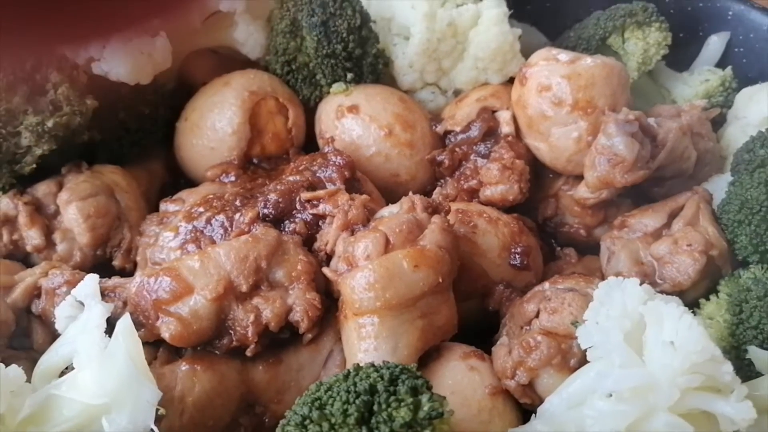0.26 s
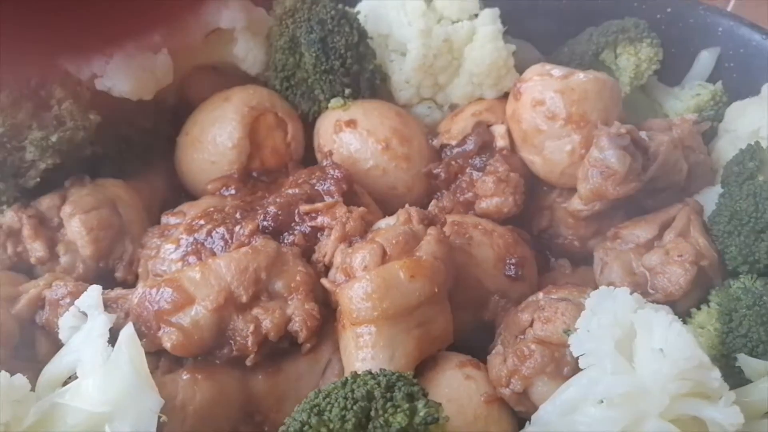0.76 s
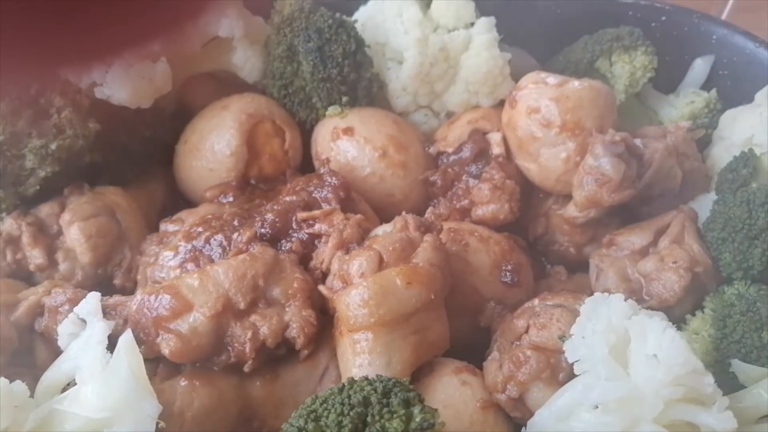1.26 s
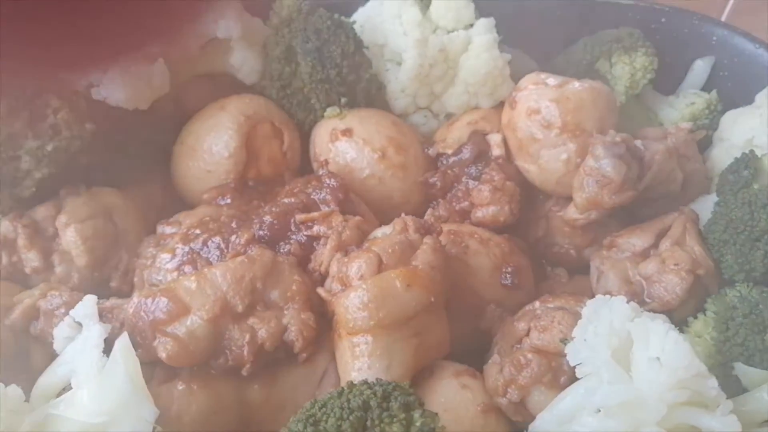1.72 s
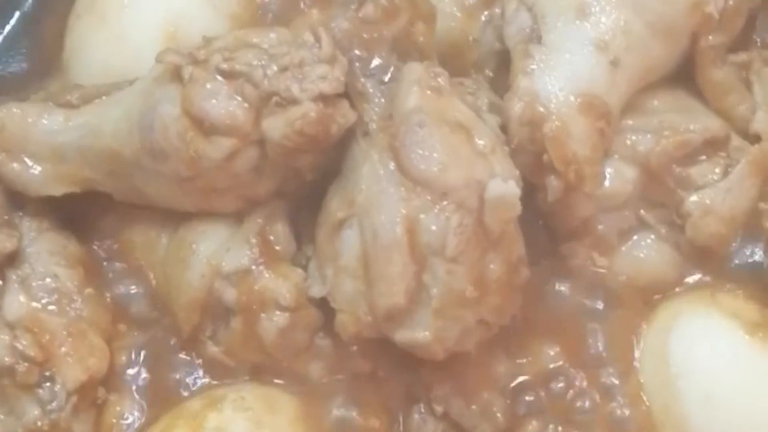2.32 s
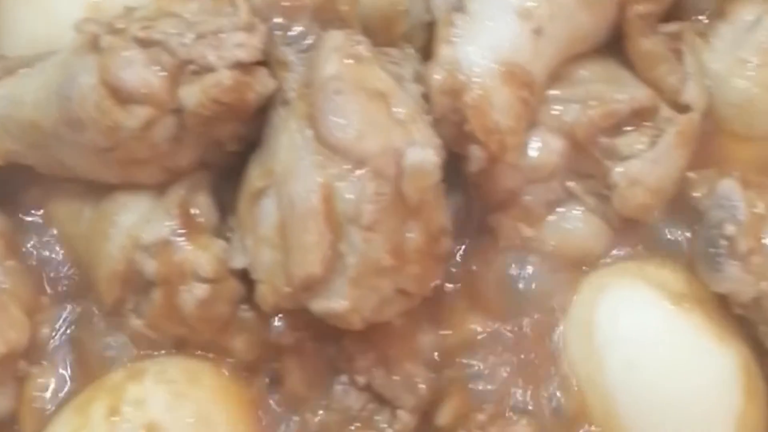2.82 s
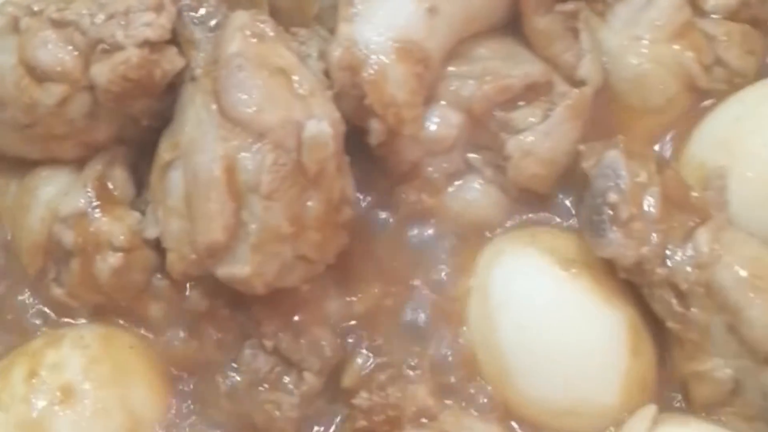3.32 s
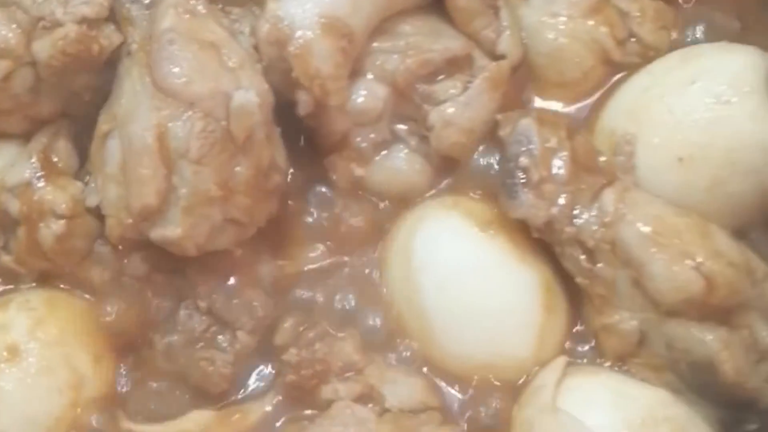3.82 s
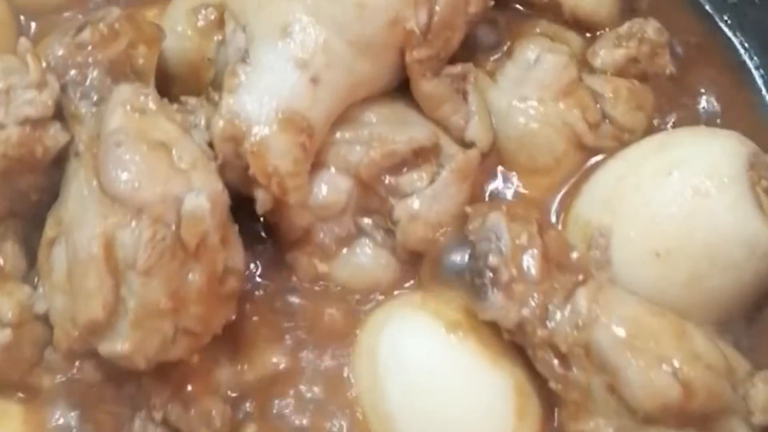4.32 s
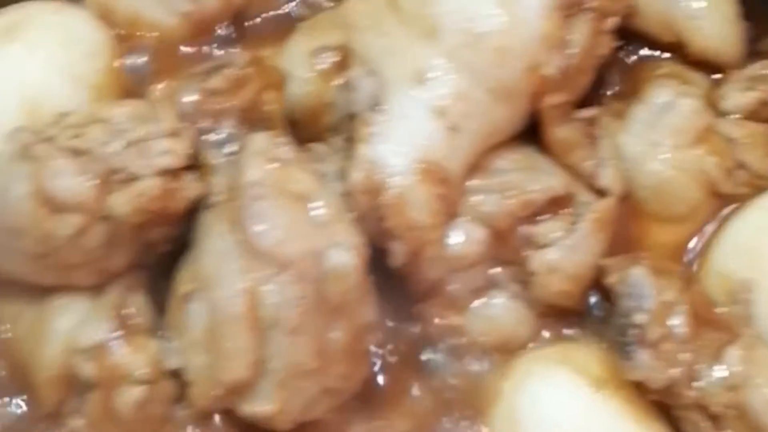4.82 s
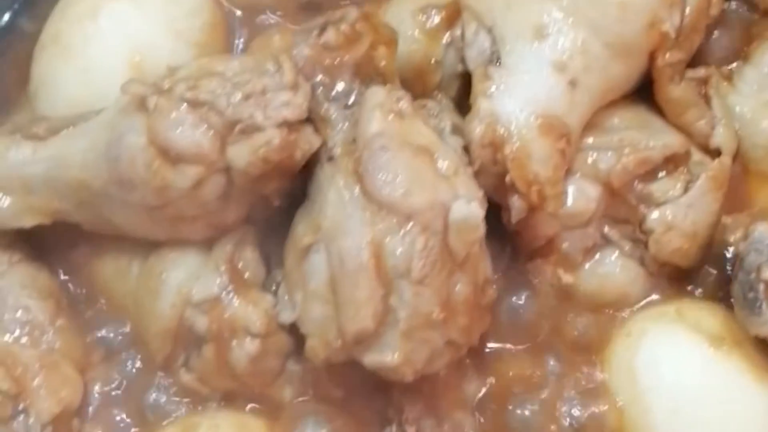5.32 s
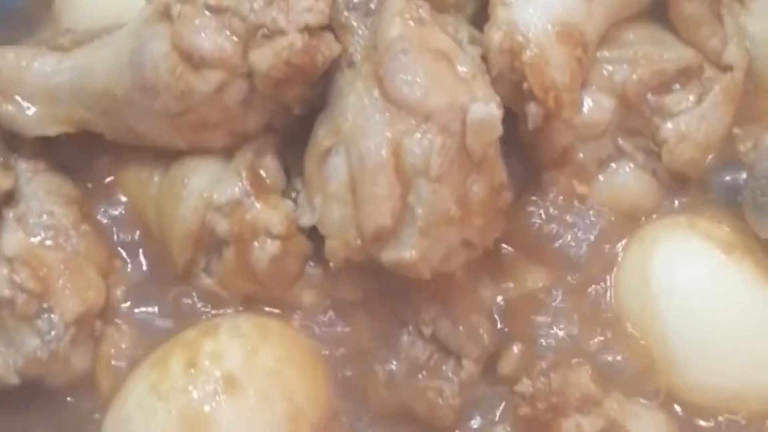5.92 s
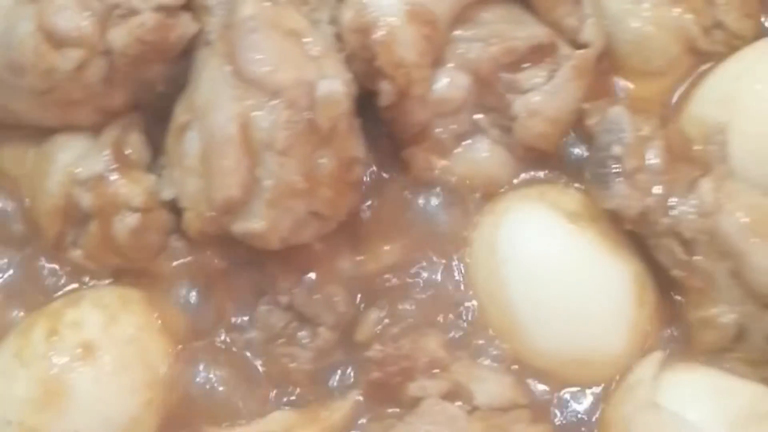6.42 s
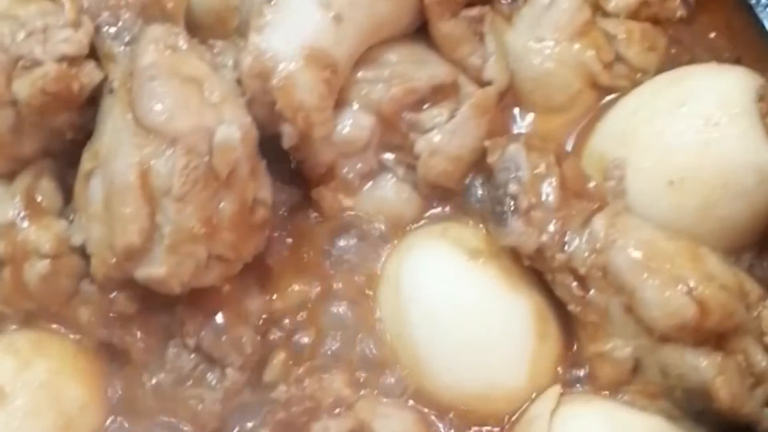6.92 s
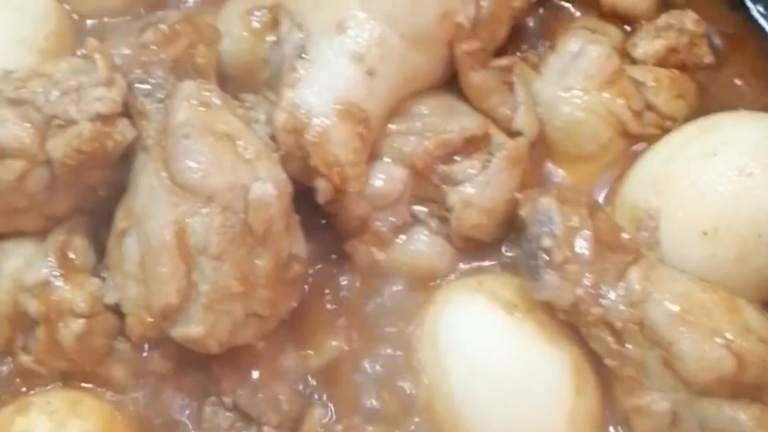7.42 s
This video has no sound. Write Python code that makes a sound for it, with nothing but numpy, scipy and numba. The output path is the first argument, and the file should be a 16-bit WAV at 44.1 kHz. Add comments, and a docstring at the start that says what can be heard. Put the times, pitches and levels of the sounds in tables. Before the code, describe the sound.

Handling wobble and ringing utensils on a worktop, a moment of dead silence, then a close, steady simmer of chicken and eggs in sauce.

```python
"""Quiet kitchen, then a simmering pan

The phone wobbles in the hand; a spoon rattles, a lid and a dish are set down and ring with the room.
The sound drops out for a moment, then returns close over a pan where sauce bubbles, plops and spits.
Bubbles are dying sines that rise in pitch; utensils are contact noise plus decaying modes.
Two microphone ports a hand apart hear it all: alike in the bass, different in the treble.
"""
import sys
import numpy as np
from scipy import signal
from scipy.fft import rfft, irfft
from scipy.io import wavfile
from scipy.ndimage import uniform_filter1d
from numba import njit

SR = 44100
rng = np.random.default_rng(int(sys.argv[2]) if len(sys.argv) > 2 else 0)


def inscribe(sig):
    """Save sig as 16-bit PCM at rate SR to the path in sys.argv[1].

    A 1-D sig is mono; a 2-D sig holds one channel per row.
    Samples are clipped to [-1, 1] before scaling.
    """
    pcm = np.round(np.clip(np.atleast_2d(sig).T, -1, 1) * 32767)
    wavfile.write(sys.argv[1], SR, pcm.astype(np.int16))


N = 337806
T = np.arange(N) / SR
DROPOUT_S, RETURN_S = 1.8142, 2.258  # silence between these times

# Clearest bubbles, close over the pan: start_s [s], level_db [dB], pitch_hz [Hz], left_minus_right_db [dB]
PLOP_EVENTS = [(2.329, -47, 970, -13), (2.462, -51, 1020, -10), (2.514, -51.5, 1020, -11),
               (2.537, -45.5, 1480, 0), (2.577, -45.5, 1720, -7), (2.747, -47, 996, -6),
               (2.937, -49, 950, -1), (3.02, -43.5, 2900, 10), (3.087, -46, 1720, -4),
               (3.112, -53, 1420, 0), (3.147, -50.5, 1660, 4), (3.249, -48, 1620, 10),
               (3.491, -48.5, 1520, 2), (3.616, -43.5, 960, -1), (3.67, -48, 2160, 4),
               (3.879, -47, 1140, 0), (4.21, -53, 1130, 3), (4.231, -47.5, 1130, 4),
               (4.344, -48.5, 1135, 5), (4.727, -48, 1013, -11), (5.061, -40.5, 2380, 6),
               (5.151, -49, 1065, -8), (5.18, -43, 1034, -5), (5.36, -45, 1110, -3), (5.48, -48.5, 820, 7),
               (5.629, -47, 1020, -9), (5.652, -46, 1110, .6), (5.679, -46, 1720, 3),
               (5.952, -45, 2950, -8), (6.023, -55, 640, 15), (6.088, -53, 930, 4), (6.151, -58, 3280, -11),
               (6.371, -40, 2140, 7), (6.412, -41.5, 1870, 1), (6.335, -55, 1330, 0), (6.443, -49, 1790, 0),
               (6.502, -53.5, 910, 0), (6.652, -56, 1000, .6), (6.73, -48, 3100, 10),
               (6.754, -53, 1040, -2), (6.851, -41.5, 3000, 11.5), (6.88, -61, 1070, 1),
               (7.595, -43.5, 1840, 3)]


def bursting_bubbles():
    """Big bubbles burst with a note, a slump, a splash of small neighbours and a click."""
    s, db, hz, pan_db = with_faint(PLOP_EVENTS, per_s=22, lo_hz=700, hi_hz=2600,
                                   top_db=-54, range_db=7, pan_range_db=16)
    # about 5 ms of ring; the smallest just splash
    cycles = hz * .0052 * np.clip(1750 / hz, 0, 1) ** 5
    note = bubbles(s, hz, np.maximum(cycles, 2.5), 0.04, db, pan_db, 0.17)
    slump = bubbles(s, 0.31 * hz, 1.1, .1, db - 10.5, pan_db / 2, 0.32)  # the sauce slumps back
    splash_db = db - 5.0 + 2.6 * (hz > 1850)
    splash = spray(s, 1.28 * hz, splash_db, pan_db, spread_ms=14., cycles=2.6, width=0.62, count=7)
    click = bubbles(s, 1.5 * hz, 0.35, .1, db - 14.5, pan_db, 0.18)  # the skin tears
    return note + slump + splash + click


def snapping_films():
    """Films of sauce snap at random times, each with barely one swing."""
    where, pitch, luck, place = rng.random((500, 4)).T
    db = -58 - 3.2 * np.log(luck + 0.03)
    return bubbles(where * N / SR, 300 * 5.5 ** pitch, 0.52, 0.081, db, 1.9, 0.37 * place)


# Clearest deep gulps in the pan: start_s [s], level_db [dB], pitch_hz [Hz]
GULP_EVENTS = [(2.602, -46.5, 370), (2.933, -42.5, 390), (3.603, -62, 440), (3.756, -54, 370),
               (5.357, -59, 334), (5.727, -50, 288), (5.814, -52, 355), (6.018, -53, 340),
               (6.748, -51, 342), (7.071, -55.5, 257)]


def gulps():
    """Deep bubbles gulp as short low notes, all towards the left port."""
    s, db, hz = with_faint(GULP_EVENTS, per_s=4, lo_hz=240, hi_hz=400, top_db=-52, range_db=8)
    return bubbles(s, hz, 2.4, 0.088, db, 5.3, 0.42)


# Clearest fat spits, close to the ports: start_s [s], level_db [dB, relative], pitch_hz [Hz],
# left_minus_right_db [dB]
SPIT_EVENTS = [(2.3125, -43, 8140, 9), (2.456, -43, 6700, -12), (2.4874, -38, 7350, -3),
               (2.7688, -44, 4840, 4), (2.9322, -46.5, 8400, 16), (3.0232, -42, 5350, -7),
               (3.07, -42.5, 7200, 4), (3.1566, -44, 7400, 8), (3.2068, -46, 8650, 9),
               (3.305, -45, 7200, -1.5), (3.4163, -40.5, 5600, 6), (3.536, -42, 8350, 13),
               (3.5902, -40, 7200, 2), (3.805, -49, 6310, 6), (4.1338, -43, 7050, 1),
               (4.2669, -50, 7190, 5), (4.2983, -54, 6540, -1.5), (4.3675, -44.5, 5060, 10),
               (4.426, -46.5, 4900, 17), (4.6505, -40.5, 5300, -4), (5.2441, -50, 7300, -.6),
               (5.369, -43, 5260, -.6), (5.754, -40, 5470, 5), (5.7979, -43, 5360, 3),
               (5.8987, -46, 8160, 11), (5.9605, -41, 9600, 6), (6.0734, -48, 9100, 20),
               (7.052, -42, 9100, 6)]


def spits():
    """Fat spits as high, brief notes, each followed by a short spray."""
    s, db, hz, pan_db = with_faint(SPIT_EVENTS, per_s=14, lo_hz=5000, hi_hz=11000,
                                   top_db=-49, range_db=9, pan_range_db=14)
    spit = bubbles(s, hz, 5, .05, db - 3, pan_db, .13)
    return spit + spray(s, hz, db - 7.0, pan_db, spread_ms=28., cycles=6.0, width=0.7, count=12)


def plops(room):
    """Single events in the pan, heard direct and through the early part of the room's echo."""
    pops = bursting_bubbles() + snapping_films() + gulps() + spits()
    return pops + undb(-9.0) * through(pops.mean(axis=0), room[:, :4000])


def froth_bubbles():
    """Thousands of bubbles all over the pan, fading in and out in bursts."""
    where, pitch, luck, place, life = rng.random((30000, 5)).T
    s = where * N / SR
    hz = 90 * (15500 / 90) ** (pitch ** .62)
    at = (s * SR).astype(int)
    small = np.clip(np.log2(hz / 2500), 0, 1)  # 0 for big bubbles, 1 for the smallest
    # small bubbles come and go faster than big ones
    burst_db = 3.5 * np.tanh((1 - small) * walk(14)[at] + small * walk(35)[at])
    db = 4.52 * np.log2(hz / 1000) - (3.6 - 0.82 * small) * np.log(luck + 0.04) + burst_db
    cycles = 3.74 + (4.7 + 5.8 * small) * life
    return bubbles(s, hz, cycles, 0.36, db, 10.0 * (place - .5), 0.16 + 0.77 * (place - .5))


# Overall colour of the simmer, with the top cut above about 15 kHz:
# pitch_hz [Hz], level_db [dB per Hz, relative]
SIMMER_COLOUR = [(25, -7.5), (60, 7.5), (200, -6), (400, 4.5), (800, 1), (1500, -3), (3000, -12), (5000, 0),
                 (8000, -1.5), (10500, -10), (13500, -17.5), (14800, -12.5), (15300, -23), (16000, -99)]
# Air in the pan and the microphone ports: pitch_hz [Hz], width_hz [Hz], left_db [dB], right_db [dB]
PAN_AIR_MODES = [(138, 18.5, 15, 10.5), (256, 22, 11.5, 8), (335, 64, 2.5, 6), (531, 52, -22.5, -16.5),
                 (647, 193, 5.5, -12.5), (944, 71, -5, 5), (1120, 125, 3.5, 9), (1250, 120, -6, -0.5),
                 (1776, 22, 7.5, 5), (3046, 1490, 17, 16), (3850, 1040, -8, -4.5), (7040, 990, -6.5, 8.5),
                 (8610, 1500, 7, -4.5)]


def simmer(room):
    """Froth above a fine fizz, coloured overall and by pan air and ports; louder just after the return."""
    boil_gain_db, sizzle_gain_db = -57, -56.5  # below and above 3.8 kHz
    fade_db_per_s, first_db, first_s = -0.3547, 4, 0.18
    since = np.clip(T - RETURN_S, 0, None)
    slow_db = fade_db_per_s * since + first_db * np.exp(-since / first_s)
    froth = level(froth_bubbles(), 0)
    fizz = level(ports(550), -0.46) * undb(0.88 * walk(10))
    near = froth + fizz
    near = near + undb(-10.0) * through(near.mean(axis=0), room[:, :4000])
    colour = [response(SIMMER_COLOUR, [(f, w, g[side]) for f, w, *g in PAN_AIR_MODES]) for side in (0, 1)]
    pan = level(through(near, colour), 2.81)
    # zero phase, so that the rest is a clean low band
    sizzle = signal.sosfiltfilt(signal.butter(2, 3800, "highpass", fs=SR, output="sos"), pan)
    boil = pan - sizzle
    return (boil * undb(boil_gain_db) + sizzle * undb(sizzle_gain_db)) * undb(slow_db)


# Spoon blows: start_s [s], level_db [dB, relative], ring_db [dB above the contact noise]
SPOON_HITS = [(0.879, -47.5, -9), (0.8835, -38.5, -11.5), (0.892, -44.5, -11), (0.900, -40.5, -12.5),
              (0.9135, -49.5, -0.5), (0.917, -39, 2), (0.926, -41.5, 2), (0.942, -40.5, -2.5),
              (0.955, -43.5, -5), (0.967, -44, 2), (0.979, -49.5, -2.5), (0.992, -51, -5.5),
              (1.003, -53, -9), (1.02, -62, -1), (1.05, -62.5, -2.5)]
# Spoon modes: pitch_hz [Hz], level_db [dB], t60_s [s]
SPOON_MODES = [(830, -8, .2), (2110, -8, .12), (2396, -8, .1), (2600, -8, .12), (5227, -1, .1),
               (5420, -1, .07), (5700, -8, .06), (6830, -8, .08), (7031, -3, .07), (7230, -6, .14),
               (7714, -9, .07), (8635, -13, .16), (9109, -13, .08), (10190, -8, .06), (12100, -14, .06),
               (12640, -11, .07), (14770, -5, .06)]
# Spoon contact noise: pitch_hz [Hz], level_db [dB per Hz, relative]
SPOON_SCRAPE = [(59, -39.5), (100, -22), (315, -3), (547, -28), (836, 0.5), (1610, -5.5), (2370, 2.5),
                (4670, -29.5), (5420, -16.5), (10500, -29), (11200, -30), (15000, -24), (16000, -48.5)]


def spoon():
    """A rattling spoon: scraping contact and short metal modes, damped at the end."""
    modes = SPOON_MODES + shimmer(25, 2500, 7500, top_db=-15, t60=.08)
    return struck(SPOON_HITS, modes, SPOON_SCRAPE, rise_ms=1.5, noise_ms=10.0, damped_s=1.07)


# Lid blows: start_s [s], level_db [dB, relative], ring_db [dB above the contact noise]
LID_HITS = [(1.171, -33.5, -6.5), (1.174, -30, 3.5), (1.179, -35, -9), (1.192, -34, -8),
            (1.206, -37.5, -10.5), (1.222, -41.5, -9.5), (1.278, -33.5, -1)]
# Lid modes: pitch_hz [Hz], level_db [dB], t60_s [s]
LID_MODES = [(4554, -22, .22), (5270, -24, .45), (5814, -26, .4), (6089, -23, .4), (6783, -18, .29),
             (6977, -13, .15), (7489, -19, 2.5), (7870, -13, .18), (8156, -14, .19), (8220, -21, .35),
             (8586, -13, .19), (8980, -18, .25), (9103, -10, .13), (9259, -15, .16), (9487, -18, .3),
             (9744, -17, .25), (10080, -20, .17), (10345, -13, .13), (10996, -7, .24), (11700, -14, .25),
             (11990, -20, .26), (12500, -11, .14), (13150, -17, .3), (13670, -12, .14), (13880, -19, .26),
             (14170, -19, .25), (14580, -16, .13), (15210, -18, .25), (15460, -12, .12), (15658, -14, .22)]
# Lid contact noise: pitch_hz [Hz], level_db [dB per Hz, relative]
LID_CRASH = [(59, -60.5), (100, -36.5), (358, -16), (524, -4.5), (691, -7), (1100, 3.5), (1480, -5),
             (1610, -1), (3050, -15.5), (3400, -19.5), (3700, -37.5), (7290, -15), (16000, -26)]


def lid():
    """A lid set down: a crash and a dense treble shimmer of modes, then damped."""
    modes = LID_MODES + shimmer(110, 3000, 15600, top_db=-22, t60=.38)
    return struck(LID_HITS, modes, LID_CRASH, rise_ms=.7, noise_ms=12.5, damped_s=1.43)


# Dish blows: start_s [s], level_db [dB, relative], ring_db [dB above the contact noise]
DISH_HITS = [(1.4265, -36, 2), (1.4288, -30, 4.5), (1.440, -39, -0.5)]
# Dish modes: pitch_hz [Hz], level_db [dB], t60_s [s]
DISH_MODES = [(290, -15, .19), (668, -24, .25), (856, -16, .19), (1272, -15, .32), (1357, -24, .5),
              (2083, -4, .1), (2089, -14, .8), (2143, -9, .15), (2880, -23, .3), (3731, -24, .37),
              (3760, -13, .28), (4700, -30, .4), (5098, -32, .27), (5550, -24, .16), (5708, -15, .42),
              (6315, -24, .17), (6417, -36, .5), (6600, -32, .4), (6804, -17, .42), (7413, -30, .3),
              (7988, -5, .27), (8071, -16, .48), (8383, -8, .31), (8549, -25, .6), (8617, -12, .42),
              (9258, -12, .25), (9959, -17, .85), (10420, -31, .55), (10620, -30, .45), (12100, -26, .24),
              (12560, -14, .09), (12790, -34, .2), (13090, -17, .16), (13600, -26, .25), (13720, -27, .12),
              (14020, -22, .22), (14540, -31, .25), (15230, -22, .23), (15500, -30, .12)]
# Dish contact noise: pitch_hz [Hz], level_db [dB per Hz, relative]
DISH_CLINK = [(59, -42.5), (100, -38.5), (350, -1), (1800, -6.5), (2080, -11), (2370, -12), (3780, -5.5),
              (4290, -22), (8110, 5), (11400, -19), (16000, -32.5)]


def dish():
    """A dish set down: a clink and modes that ring on undamped."""
    modes = DISH_MODES + shimmer(40, 1000, 10700, top_db=-28, t60=.32)
    return struck(DISH_HITS, modes, DISH_CLINK, rise_ms=0.99, noise_ms=15.0)


# Knocks on the worktop: start_s [s], level_db [dB, relative], ring_db [dB above the contact noise]
KNOCK_HITS = [(1.174, -40, 8.5), (1.2765, -27, -4.5), (1.280, -33, -6.5), (1.291, -41, -4),
              (1.315, -38.5, -4.5), (1.335, -38.5, 1.5), (1.581, -36.5, -13)]
# Worktop modes: pitch_hz [Hz], level_db [dB], t60_s [s]
WORKTOP_MODES = [(770, -5.5, .13), (885, -2, .11), (1000, -5, .09), (1130, -5, .12), (1190, -3, .1),
                 (1497, -9, .1), (1944, -12.5, .1), (2460, -15, .08)]
# Dull contact noise, also for pot and cup: pitch_hz [Hz], level_db [dB per Hz, relative]
DULL_THUD = [(60, -32.5), (124, -12.5), (300, -6), (500, -11.5), (850, 1.5), (1200, -1.5), (2600, -7.5),
             (3600, -17.5), (4600, -30.5), (8000, -31.5), (16000, -51)]


def knocks():
    """Dull knocks through the worktop, whose modes die quickly."""
    modes = WORKTOP_MODES + shimmer(24, 600, 1700, top_db=-6, t60=.15)
    return struck(KNOCK_HITS, modes, DULL_THUD, rise_ms=1.9, noise_ms=20.8)


# Pot and cup blows: start_s [s], level_db [dB, relative], ring_db [dB above the contact noise]
POT_HITS = [(1.675, -55, 3.6)]
CUP_HITS = [(1.66, -60, 6.5), (1.705, -57, 6.6)]
# Pot and cup modes: pitch_hz [Hz], level_db [dB], t60_s [s]
POT_MODES = [(884, -4, 2.5), (915, 0, 2.5)]
CUP_MODES = [(2336, 0, .7), (2546, -15, 1.1)]


def pot():
    """A brushed pot hums on two close notes that swell slowly."""
    return struck(POT_HITS, POT_MODES, DULL_THUD, rise_ms=25.0, noise_ms=5.9)


def cup():
    """A brushed cup hums on two higher notes."""
    return struck(CUP_HITS, CUP_MODES, DULL_THUD, rise_ms=15.0, noise_ms=3.0)


def clatter(room):
    """All utensils, a little stronger at the left port, with the echo of the room."""
    contact, ring = np.sum([spoon(), lid(), knocks(), dish(), pot(), cup()], axis=0)
    wet = undb(-5.5) * contact.mean(axis=0) + undb(-8.0) * ring[0]
    return (contact + ring) * undb([[1.2], [-1.2]]) + through(wet, room)


def struck(blows, modes, noise, rise_ms, noise_ms, damped_s=9):
    """Every blow throws a burst of contact noise and adds energy to the modes, until something damps them."""
    uneven_db = 2.0  # each blow lands elsewhere and favours other modes
    first, last = int(blows[0][0] * SR), int(DROPOUT_S * SR) + 1
    t = T[first:last]
    since = np.array([np.clip(t - s, 0, 2) for s, *_ in blows])
    _, db, ring_db = (np.array(c)[:, None] for c in zip(*blows))
    bursts = np.sum(undb(db) * np.exp(-since / noise_ms * 1000) * (since > 0), axis=0)
    grit = rng.exponential(size=len(t) // 40 + 1)  # contact comes and goes within a millisecond
    bursts *= uniform_filter1d(np.repeat(grit ** 0.39, 40), size=20)[:len(t)]
    fed = (undb(db + ring_db) * (1 - np.exp(-since / rise_ms * 1000))) ** 2  # energy from each blow
    ring = np.zeros((2, len(t)))
    chance = rng.uniform(-0.73, 1, (len(modes), 2 + len(blows)))
    for (f, mode_db, t60), (turn, split, *jolts) in zip(modes, chance):
        jolts = np.array(jolts)
        share = undb(mode_db + uneven_db * np.sin(9 * jolts)) ** 2
        size = np.sqrt(share @ (fed * np.exp(-2 * np.log(1000) * since / t60)))
        # a random phase of roughly a quarter cycle between the ports widens the treble ring
        lead = min(f / 900, 1) * np.array([[0], [np.pi / 2 * np.sign(turn) + 0.72 * turn]])
        phase = 2 * np.pi * f * t + 2.92 * jolts @ (since > 0)  # a new blow jolts the swing
        # each mode beats with a weaker twin close by
        twin = np.sin(phase + 2 * np.pi * f * 0.004 * split * t - lead)
        ring += size * (np.sin(phase + lead) + 0.51 * twin)
    ring *= np.exp(-np.clip(t - damped_s, 0, 1) / 0.01)
    pad = (first, N - last)
    contact = through(np.pad(bursts, pad) * ports(400), response(noise))
    return contact, np.pad(ring, ((0, 0), pad))


def shimmer(count, lo_hz, hi_hz, top_db, t60):
    """Faint modes scattered between the clear ones; t60 is the longest decay in s."""
    return [(lo_hz + (hi_hz - lo_hz) * a, top_db - 8 * b, t60 * (1 + c) / 2)
            for a, b, c in rng.random((count, 3))]


# Phone swinging in the hand: start_s [s, at the peak], level_db [dB, relative], half_length_s [s]
SWING_EVENTS = [(.27, -39, 0.022), (.34, -40.5, 0.04), (.44, -50, 0.022), (.505, -53, 0.013),
                (.57, -58, 0.022)]


def hand_swing():
    """A low wobble of the phone in the hand, quick at first and slower afterwards."""
    hz = np.interp(T, (0.303, 0.36), (32.6, 22.3))
    return swells(SWING_EVENTS) * np.sin(2 * np.pi * np.cumsum(hz) / SR)


# Rumble of the hand on the phone, joined by straight lines: start_s [s], level_db [dB, relative]
RUMBLE_CURVE = [(0, -61), (.15, -71), (.26, -55.5), (.45, -69), (.7, -63.5), (1.6, -75.5), (1.81, -65)]


def hand_rumble():
    """Low noise from the hand on the phone, following the level curve."""
    rumble_db, = curves(RUMBLE_CURVE)
    return undb(rumble_db) * level(band(ports(150), 20, 140), 0)


# Cloth brushing the phone: start_s [s, at the peak], level_db [dB, relative], half_length_s [s]
RUSTLE_EVENTS = [(.25, -72.5, 0.08), (.42, -68, 0.062), (.57, -78, 0.07), (1.6, -69, 0.12)]


def cloth():
    """Flickering treble noise: swells of brushing cloth over a faint steady rustle."""
    rustle = level(band(ports(300), 6600, 7600), 0) + level(band(ports(300), 1500, 7600), -1.0)
    steady_gain_db = -78.5
    return (undb(steady_gain_db) + swells(RUSTLE_EVENTS)) * undb(1.5 * walk(34)) * rustle


# Colour of the room tone: pitch_hz [Hz], level_db [dB per Hz, relative]
ROOM_COLOUR = [(24, -36), (40, -16), (198, -10.5), (295, -13), (326, -17), (499, -19), (566, -21),
               (625, -20), (1660, -29), (2070, -24), (2350, -28), (4500, -31), (15700, -39)]


def room_tone():
    """Faint noise of the room, wavering slightly in level."""
    return level(through(ports(300), response(ROOM_COLOUR)), -65.5) * undb(0.71 * walk(13))


def whine():
    """A faint steady sine."""
    return undb(-83.5) * np.sqrt(2) * np.sin(2 * np.pi * 2180 * T)


def quiet_kitchen():
    """Handling noise, a little stronger at the right port, over room tone, whine and cloth."""
    handling = (hand_swing() + hand_rumble()) * undb([[-1.2], [1.2]])
    return room_tone() + handling + whine() + cloth()


# Decay of the kitchen's echo: pitch_hz [Hz], t60_s [s]
KITCHEN_DECAY = [(125, 0.88), (500, 0.46), (1000, 0.33), (2000, 0.3), (4000, 0.18), (8000, 0.18),
                 (14000, 0.085)]


def kitchen():
    """Echo tail of the hard walls, dying band by band, different at each port in the treble."""
    t = np.arange(SR // 2) / SR
    hz, t60 = np.transpose(KITCHEN_DECAY)
    noise = ports(450)[:, :len(t)]
    tail = 0
    for f in 63 * 2. ** np.arange(9):
        decay = undb(-60 * t / np.interp(np.log(f), np.log(hz), t60))
        tail = tail + band(noise, f / np.sqrt(2), f * np.sqrt(2)) * decay
    tail = tail * np.clip(t / 0.0029, 0, 1)
    return tail / np.sqrt(np.sum(tail ** 2) / 2)


@njit
def grains(n, start, hz, cycles, glide, size):
    """Each bubble is a dying sine that rises in pitch as it nears the surface."""
    out = np.zeros(n)
    for k in range(len(start)):
        i = int(np.ceil(start[k]))
        s = -hz[k] / cycles[k] / SR + 2j * np.pi * hz[k] / SR
        z, p = size[k] * np.exp(s * (i - start[k])), np.exp(s)
        length = int(5 * cycles[k] * SR / hz[k])
        turn = np.exp(2j * np.pi * hz[k] * glide[k] / SR / length)  # pitch rise per sample
        for j in range(i, min(i + length, n)):
            out[j] += z.imag
            z *= p
            p *= turn
    return out


def bubbles(s, hz, cycles, glide, db, pan_db, lag_ms):
    """Bubbles as both ports hear them; the right one later by the lag."""
    one = np.ones_like(s)
    heard = []
    for side in (-1, 1):
        start = (s + (.5 + side * lag_ms / 2) / 1000) * SR
        heard.append(grains(N, start, hz, cycles * one, glide * one, undb(db - side * pan_db / 2)))
    return np.array(heard)


def spray(s, hz, db, pan_db, spread_ms, cycles, width, count):
    """Small neighbours that burst just after each event, at scattered pitches."""
    late, ratio, luck = rng.random((len(s), 3 * count)).reshape(-1, 3).T
    s, hz, db, pan_db = (np.repeat(c, count) for c in (s, hz, db, pan_db))
    start = s + spread_ms / 1000 * late ** 2
    return bubbles(start, hz * (0.626 + width * ratio), cycles, 0.17, db - 6 * luck, pan_db, 0.15)


def with_faint(table, per_s, lo_hz, hi_hz, top_db, range_db, pan_range_db=0):
    """Columns of the clear events followed by fainter ones at random times."""
    where, pitch, luck, place = rng.random((int(per_s * N / SR), 4)).T
    faint = [where * N / SR, top_db - range_db * luck,
             lo_hz * (hi_hz / lo_hz) ** pitch, pan_range_db * (place - .5)]
    return [np.append(clear, more) for clear, more in zip(np.transpose(table), faint)]


def swells(events):
    """Bell-shaped rise and fall around each event."""
    return sum(undb(db) * np.exp(-((T - s) / half) ** 2) for s, db, half in events)


def walk(rate):
    """Random levels held 1 / rate s and smoothed twice; spread near 1."""
    k = int(SR / rate)
    steps = np.repeat(rng.standard_normal(N // k + 1), k)
    return 1.5 * uniform_filter1d(uniform_filter1d(steps, k), k)[:N]


def ports(alike_hz):
    """Noise at two ports a hand apart: the same in the bass, unrelated above."""
    mid, side = rng.standard_normal((2, N))
    side = signal.sosfilt(signal.butter(1, alike_hz, "highpass", fs=SR, output="sos"), side)
    return np.array([mid + side, mid - side]) / np.sqrt(2)


def response(points, bells=()):
    """Causal response of unit energy for (Hz, dB) points with (Hz, width, dB) bells on top."""
    hz = np.arange(4097) * SR / 8192 + 1
    db = np.interp(np.log(hz), np.log(np.array(points)[:, 0]), np.array(points)[:, 1])
    db = db + sum(g / (1 + (2 * (hz - f) / w) ** 2) for f, w, g in bells)
    cep = irfft(db * np.log(10) / 20)  # folded cepstrum gives minimum phase
    cep[1:4096] *= 2
    cep[4097:] = 0
    h = irfft(np.exp(rfft(cep)))[:4096]
    return h / np.sqrt(np.sum(h ** 2))


def through(x, h):
    """Convolve each port with its response."""
    return signal.fftconvolve(np.atleast_2d(x), np.atleast_2d(h), axes=1)[:, :N]


def band(x, lo_hz, hi_hz):
    """Keep the band between two frequencies."""
    sos = signal.butter(2, [lo_hz, min(hi_hz, .45 * SR)], "bandpass", fs=SR, output="sos")
    return signal.sosfilt(sos, x)


def undb(db):
    """Decibels to amplitude."""
    return 10 ** (np.asarray(db) / 20)


def level(x, db):
    """Scale to an RMS level in dB."""
    return x * undb(db) / np.sqrt(np.mean(x ** 2))


def curves(table):
    """Table columns joined by straight lines over time."""
    s, *columns = np.transpose(table)
    return [np.interp(T, s, c) for c in columns]


def scene():
    """The kitchen before the dropout, silence, then the pan with its top treble cut."""
    room = kitchen()
    before, after = T < DROPOUT_S, T >= RETURN_S
    pan_top = signal.ellip(8, .2, 40, 15400, fs=SR, output="sos")
    pan = signal.sosfilt(pan_top, simmer(room) + plops(room))
    return before * (quiet_kitchen() + clatter(room)) + after * pan


def record(dry):
    """The input offset drains away after the dropout; the top is cut."""
    offset_db, drain_s, top_hz = -48.5, .09, 16823
    since = T - RETURN_S
    settle = -undb(offset_db) * np.exp(-np.abs(since) / drain_s) * (since >= 0)
    return signal.sosfilt(signal.ellip(8, .2, 70, top_hz, fs=SR, output="sos"), dry + settle)


dry = scene()
out = record(dry)
inscribe(out)
```